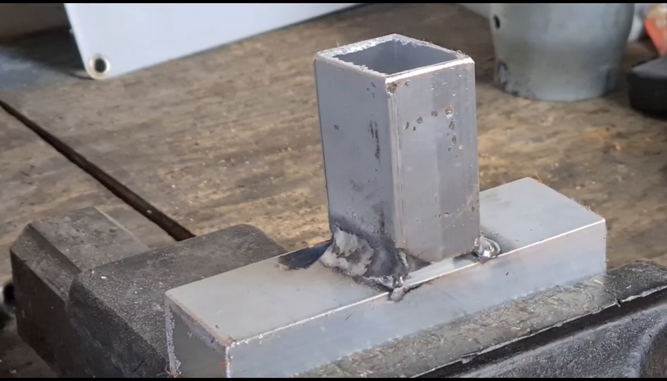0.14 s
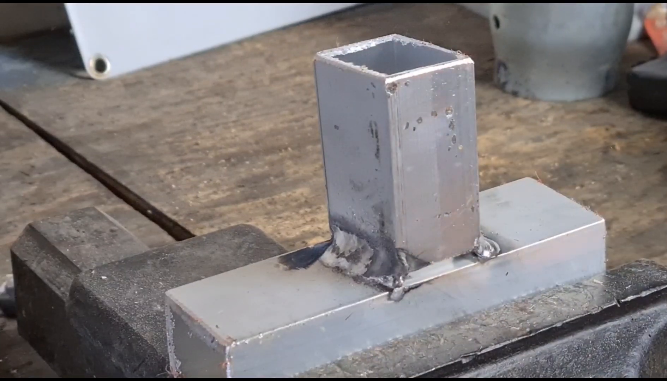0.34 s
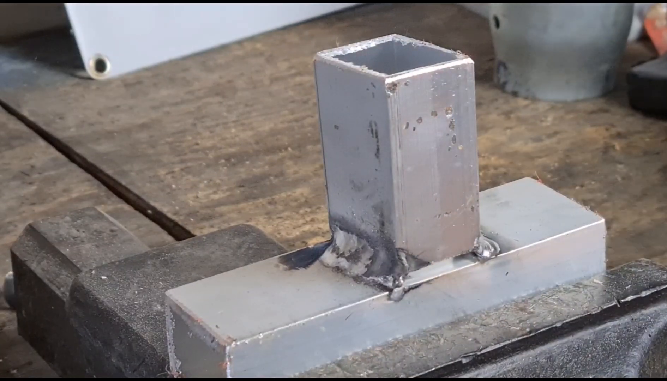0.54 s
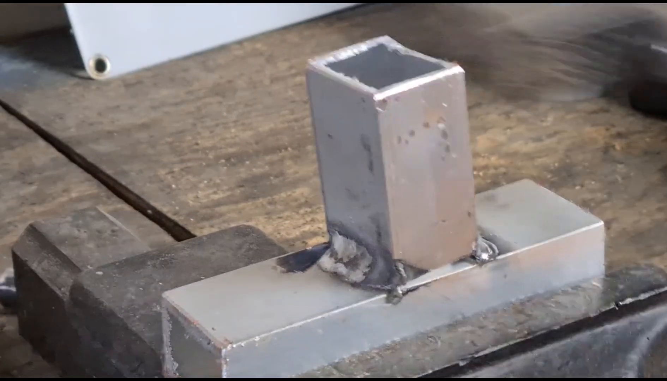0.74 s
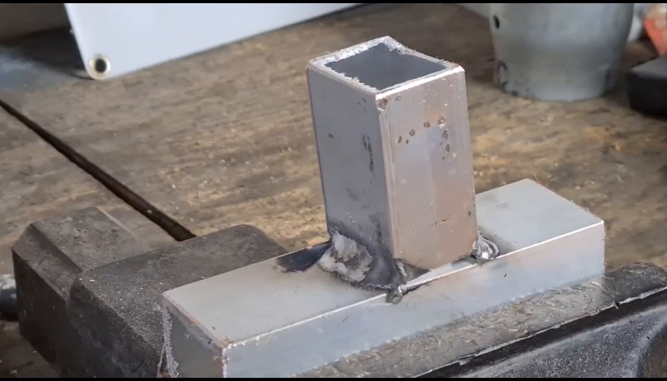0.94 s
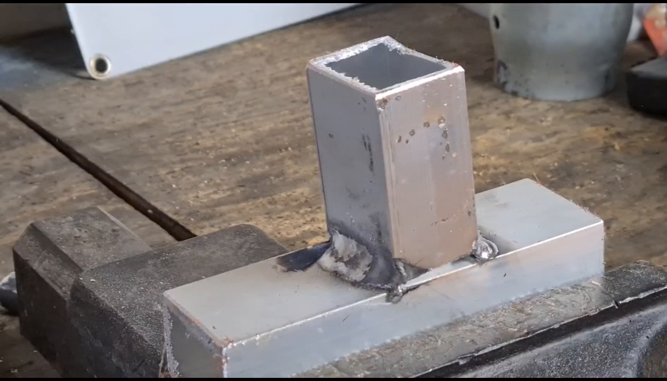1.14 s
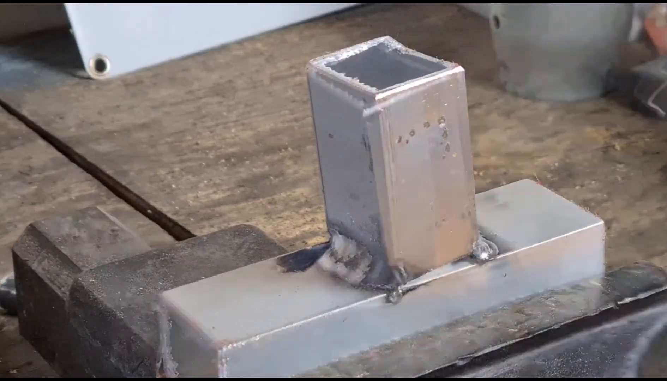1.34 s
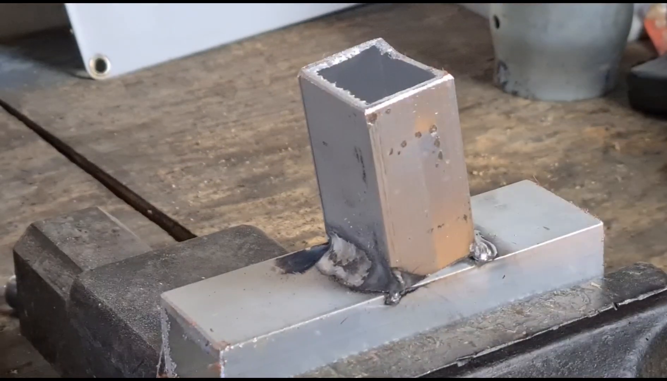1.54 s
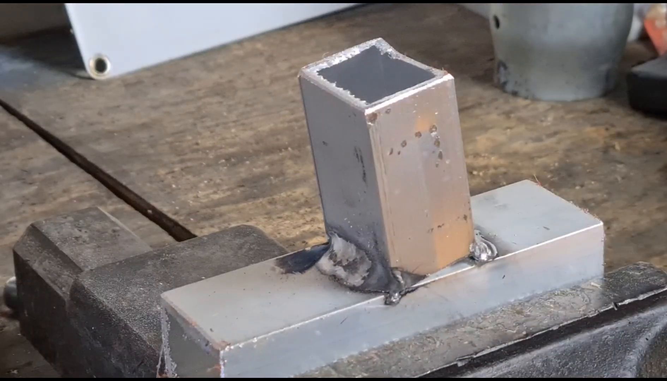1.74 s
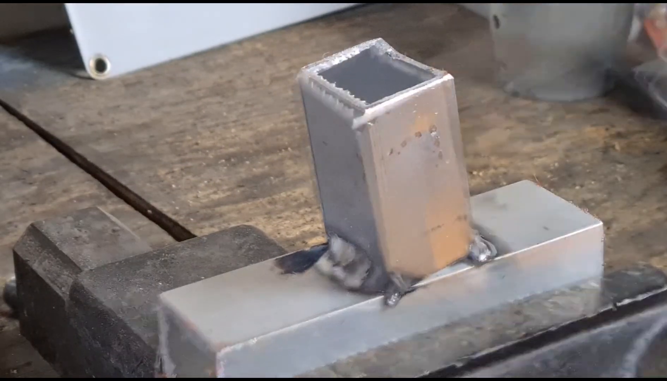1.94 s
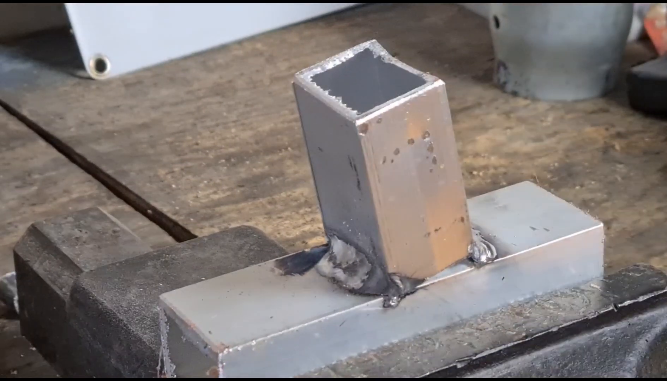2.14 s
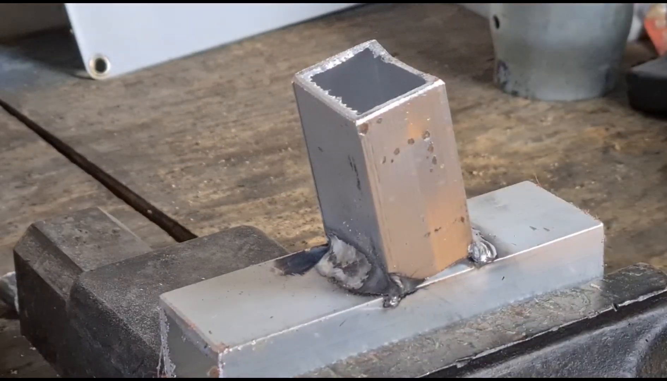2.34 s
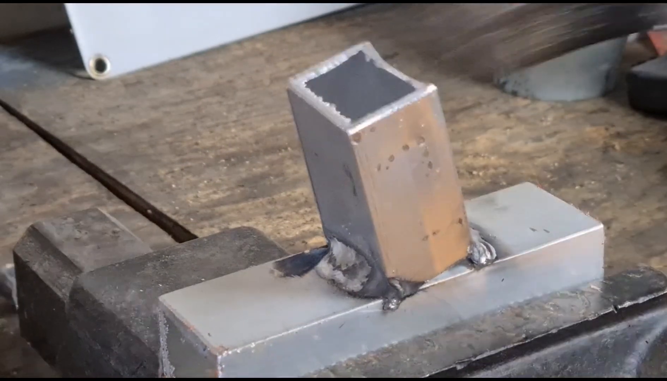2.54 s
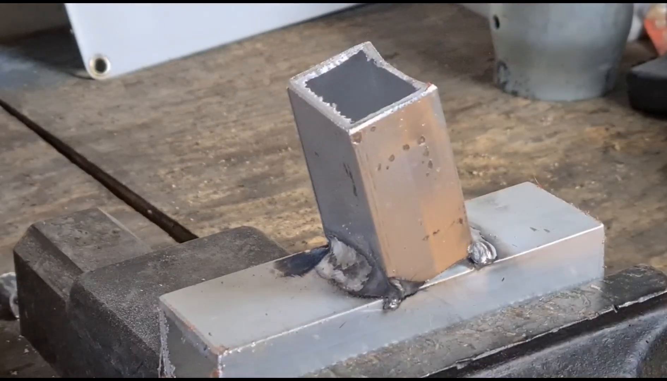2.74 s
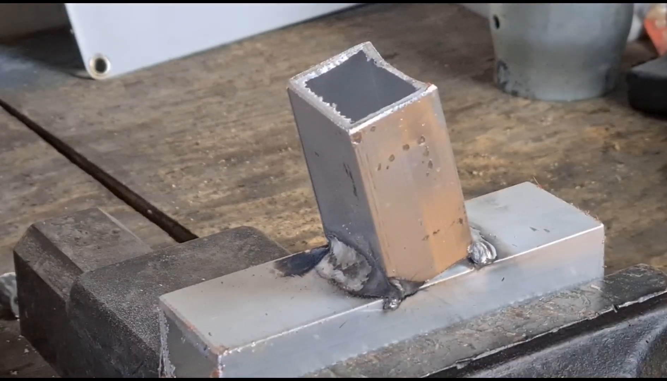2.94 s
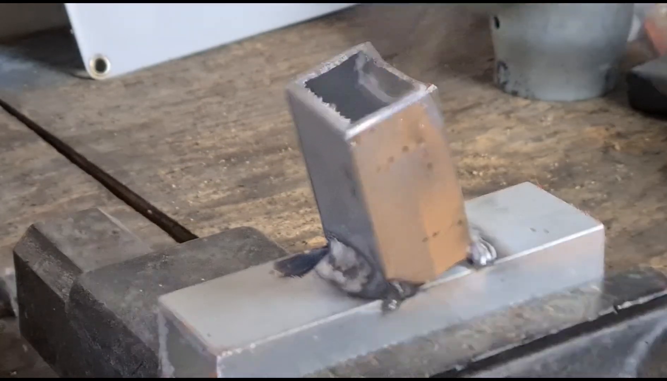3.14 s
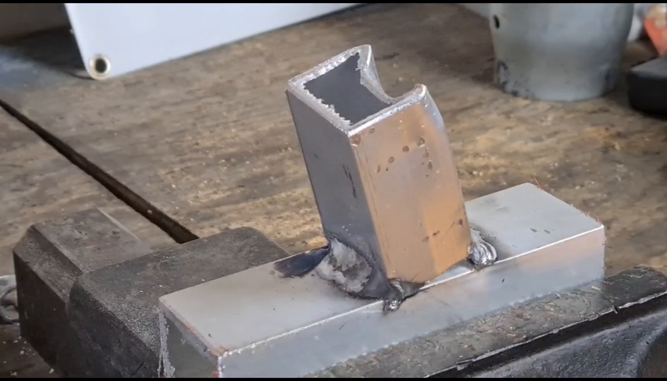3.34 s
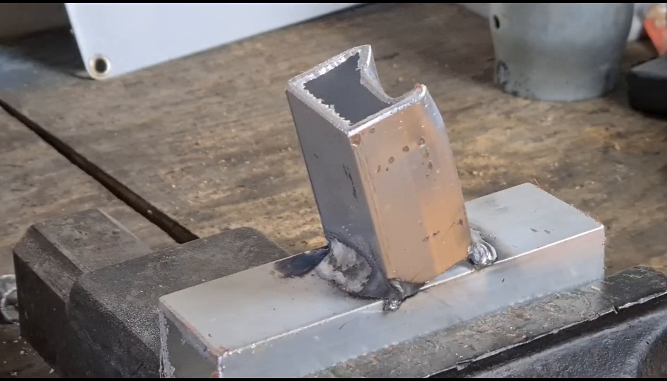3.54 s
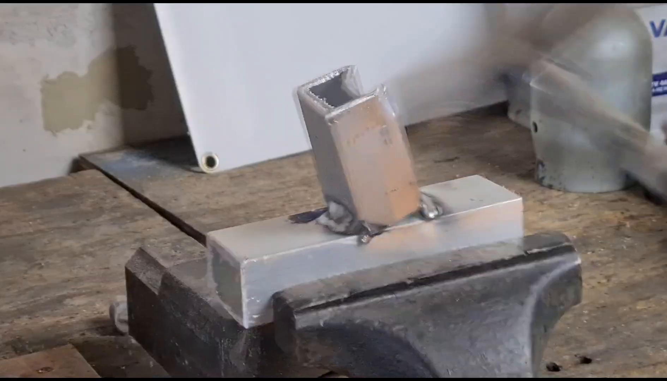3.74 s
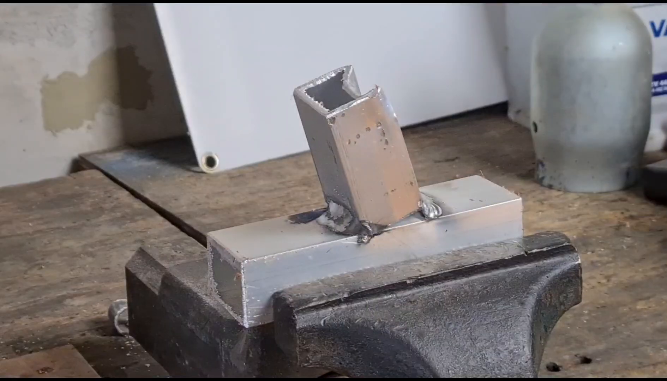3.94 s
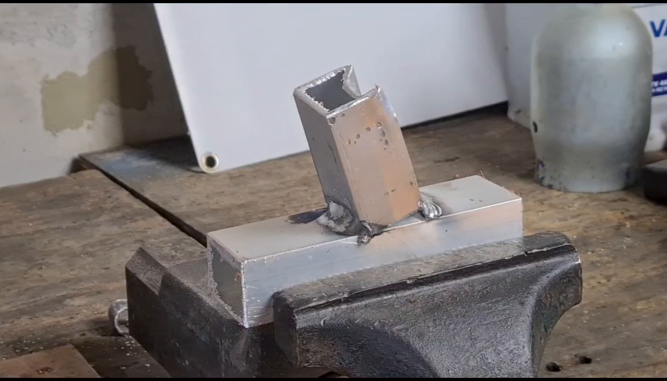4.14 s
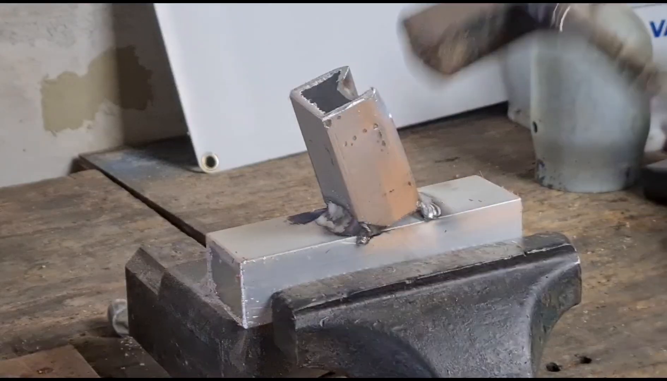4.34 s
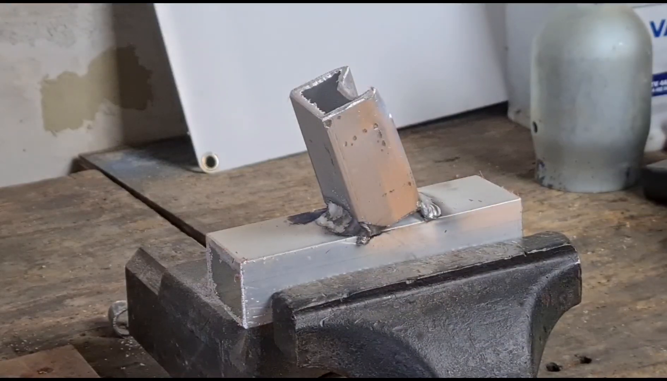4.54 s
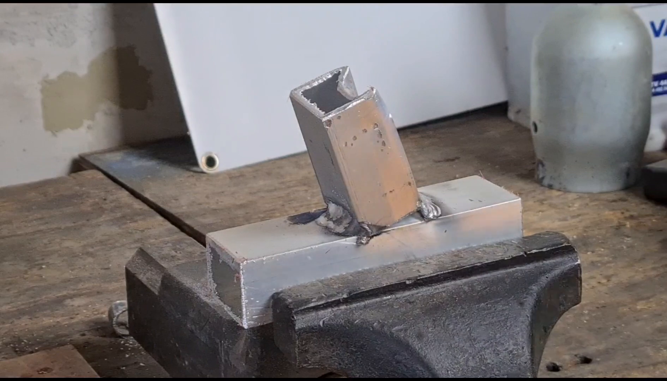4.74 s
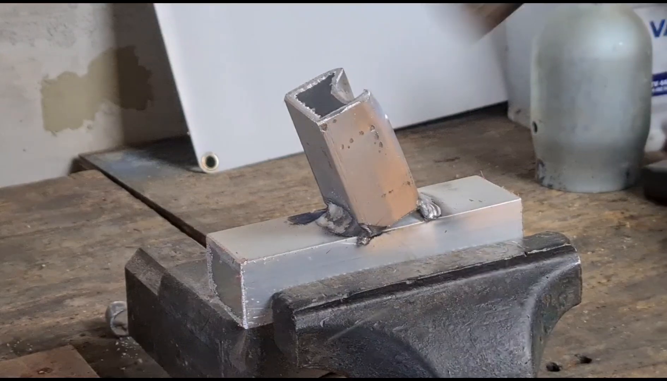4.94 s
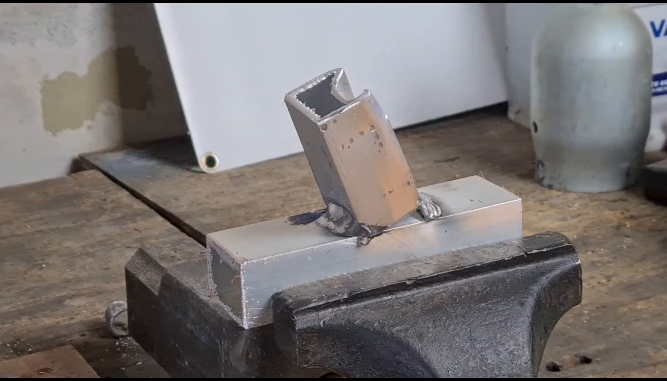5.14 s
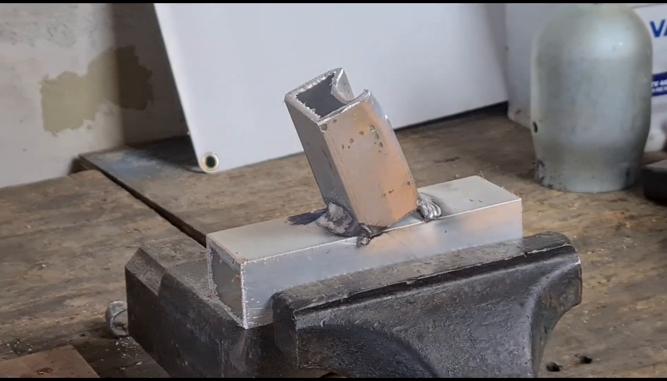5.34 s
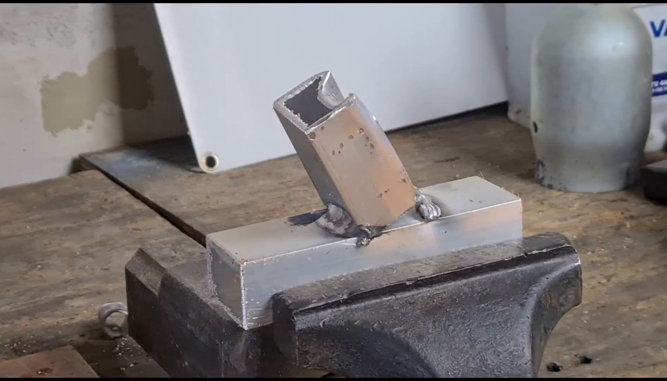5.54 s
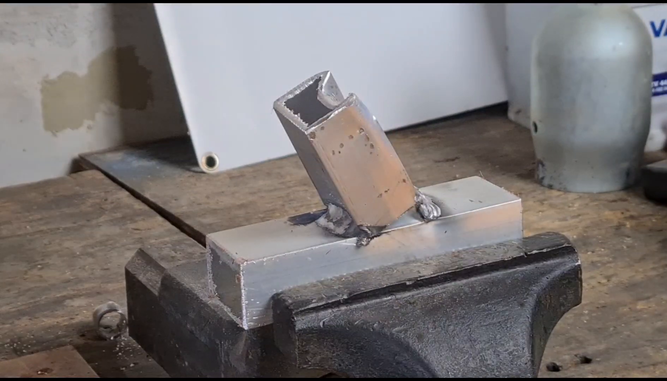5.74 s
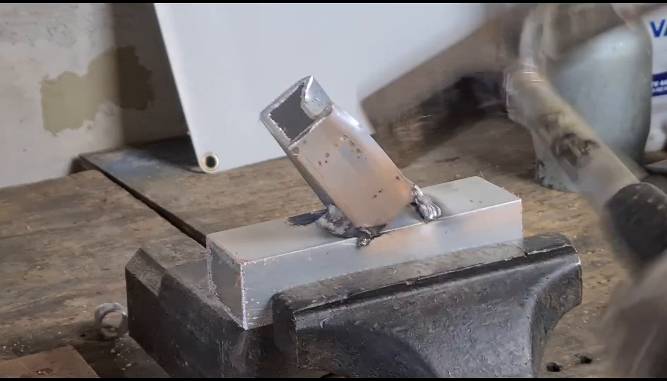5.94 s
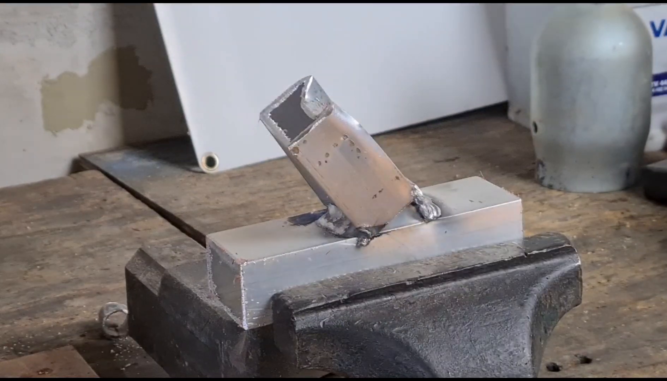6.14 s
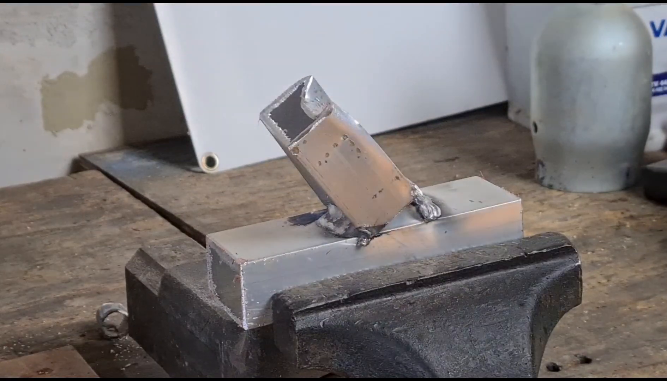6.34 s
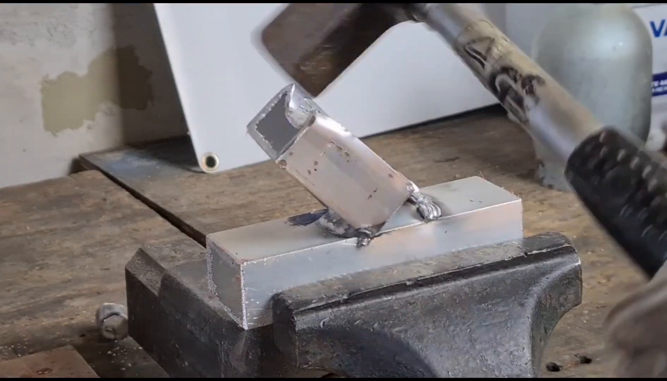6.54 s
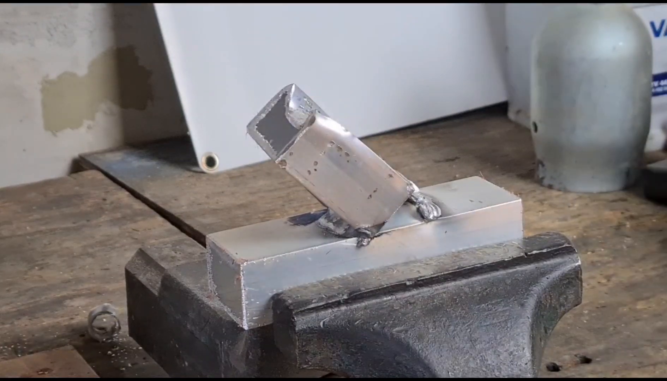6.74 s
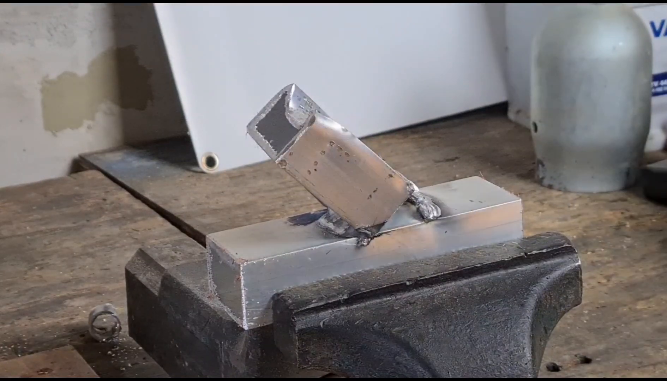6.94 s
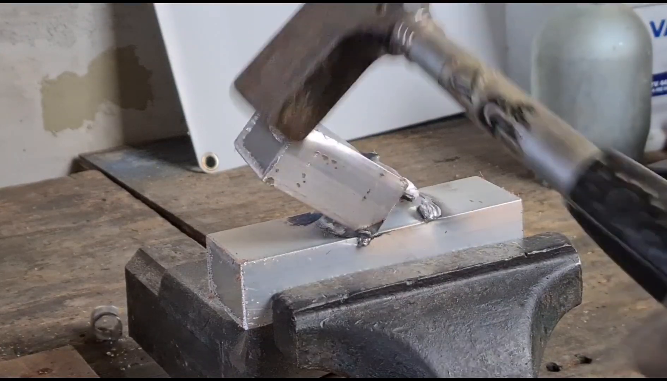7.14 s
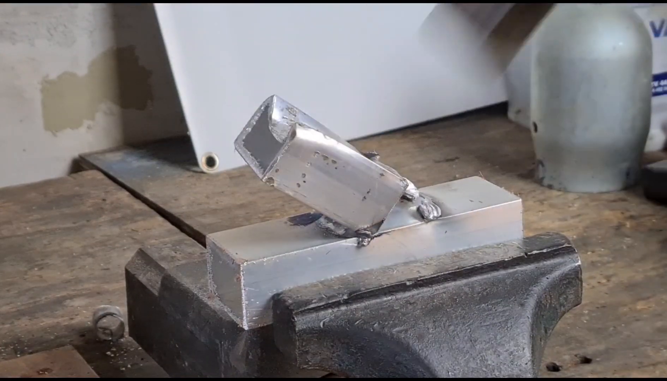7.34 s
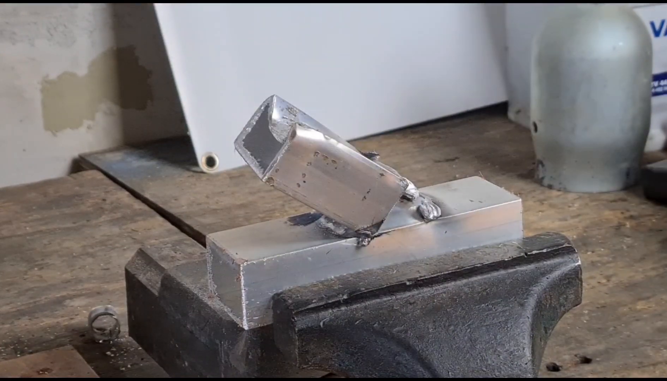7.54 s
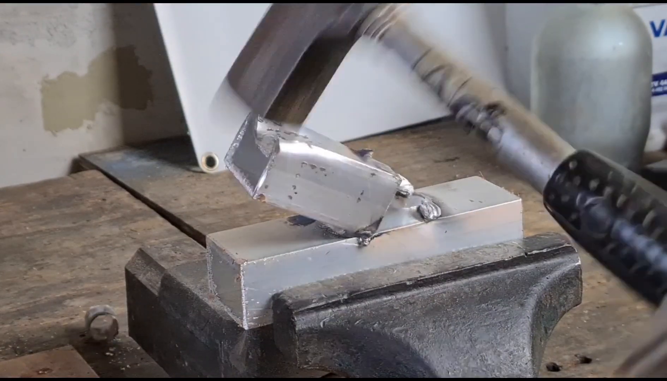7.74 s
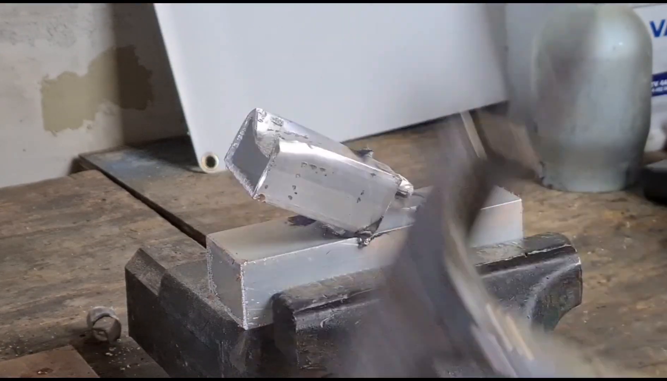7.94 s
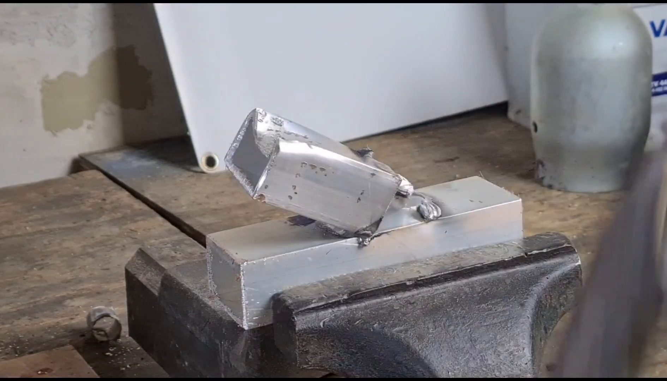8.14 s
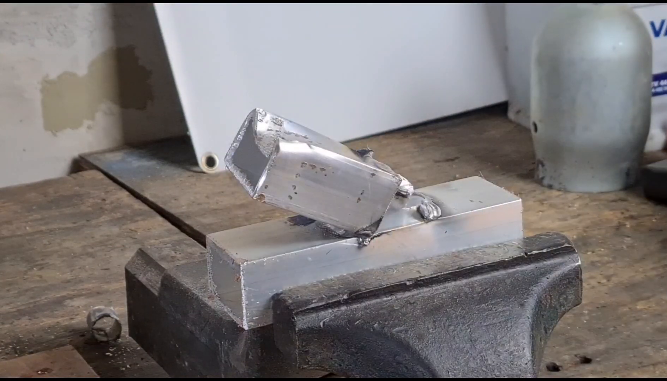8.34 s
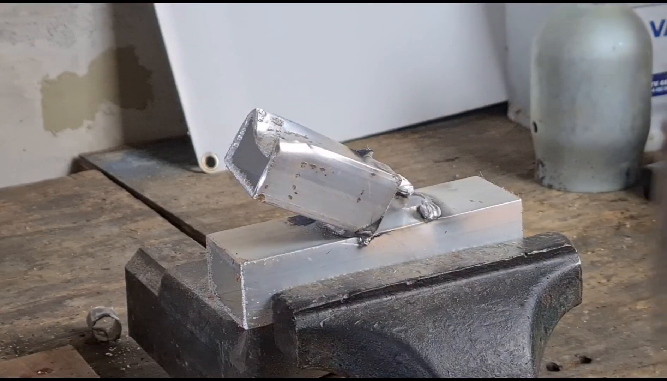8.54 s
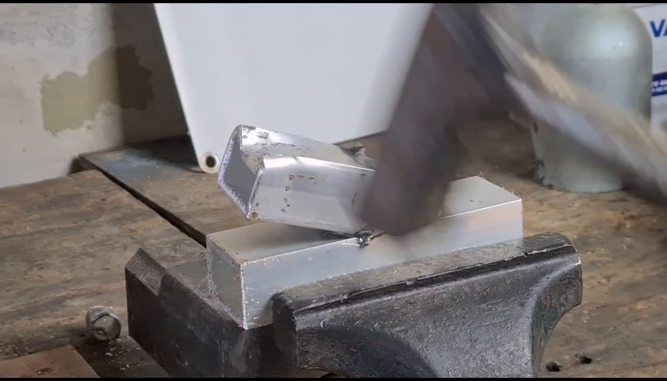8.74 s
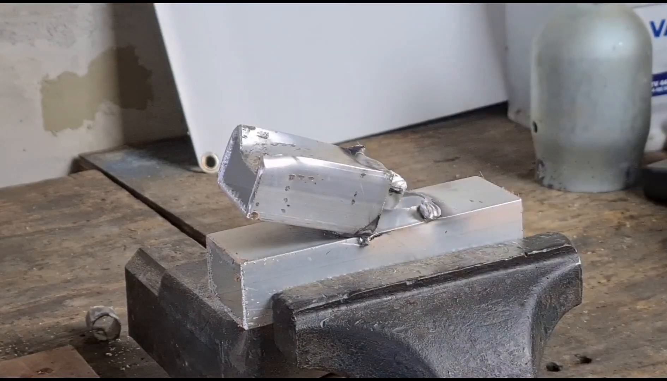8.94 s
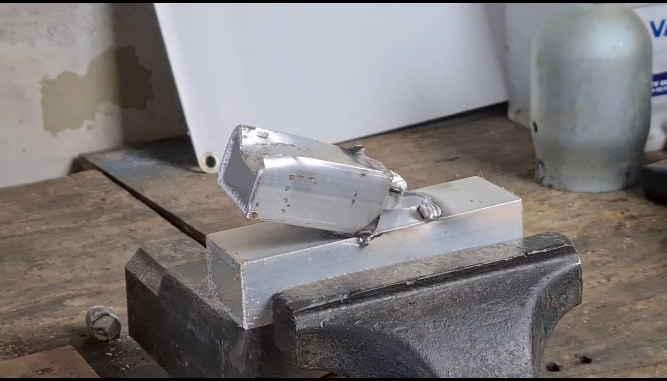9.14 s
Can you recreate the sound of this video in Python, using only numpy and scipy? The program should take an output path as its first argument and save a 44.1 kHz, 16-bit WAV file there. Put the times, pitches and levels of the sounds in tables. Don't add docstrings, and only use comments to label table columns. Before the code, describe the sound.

Loud, steady hammer blows on a welded metal tube, each a clanging crack and bench thud, turning duller and looser as the weld tears.

```python
import sys
import numpy as np
from scipy import signal
from scipy.io import wavfile
from scipy.ndimage import uniform_filter1d, minimum_filter1d

SR = 44100
rng = np.random.default_rng(int(sys.argv[2]) if len(sys.argv) > 2 else 0)


def voltage_ratio(decibels):
    exponent = np.asarray(decibels, float) / 20
    return 10 ** exponent


def int16_out(signal):
    q = np.round(np.clip(np.atleast_2d(signal).T, -1, 1) * 32767)
    wavfile.write(sys.argv[1], SR, q.astype(np.int16))


N = 405719

# start in [s], strength in [dB], brightness in [dB],
# crack in [dB], tail length as a [share].
FIRST_BLOW = [(-.06, -4.5, -4, -7, 0.95)]
# start in [s], strength in [dB], brightness in [dB], crack in [dB], tail as a [share].
BLOWS = [(.882, -10.5, -6, -11.5, 1.05), (1.471, -8.5, -4, -16.5, 1.053), (2.067, -10, -2, -10, 1.097),
         (2.6781, -10, -2, -5, 1.122), (3.293, -10.5, -2.5, -2.5, 1.08), (3.917, -6.5, -6, -11, 0.92),
         (4.447, -5.5, -5, -12, 0.91), (4.9931, -8, -3, -18, 1), (5.544, -8, -4.5, -20, 0.94),
         (6.0737, -11, -2.5, -7, 0.88), (6.638, -12.5, 3.5, 4, 1.03), (7.225, -14, 5.5, 5, 1.02),
         (7.856, -9.5, -2.5, -1, 0.8), (8.705, -8.5, 1.5, 7.5, 0.76)]
# centre in [s], level in [dB], length in [s].
MOVEMENTS = [
    (0.425, -46, 0.022),
    (0.506, -48, 0.032),
    (0.65, -51, 0.067),
    (0.823, -53, 0.014),
    (3.767, -49, 0.013),
    (3.863, -34, 0.026),
    (8.297, -51.5, 0.063),
    (8.454, -59.5, 0.068),
    (8.64, -62, 0.072),
    (9.15, -56, 0.068),
]
# frequency in [Hz], level in [dB per Hz].
SWISH_SPECTRUM = [(180, -70), (300, -60), (507, 3.5), (691, -9), (763, -0.5), (1060, -8), (2400, -11),
                  (3270, -13.5), (15000, -36)]
# frequency in [Hz], level in [dB per Hz].
ROOM_SPECTRUM = [(18, -54), (70, -25.5), (128, -9.5), (171, -6.5), (268, -4), (455, -7.5), (493, -10),
                 (625, -8.5), (1270, -13.5), (5440, -20), (14100, -23.5), (15200, -40), (16500, -77)]
# frequency in [Hz], early t60 in [s], late t60 in [s], late share in [dB], build-up in [s].
ROOM_DECAY = [(40, 2.7, 1.9, -2.5, 0.024), (103, 0.57, 4.2, -5, 0.029), (320, 0.91, 2.1, -26, 0.0021),
              (1060, 0.71, 0.69, -30, 0.0025), (3260, 0.55, 2.3, -43, 0.00071),
              (8600, 0.4, 9.5, -65, 0.0003), (16000, 0.45, 1.0, -50, .001)]
# frequency in [Hz], level in [dB], t60 in [s].
BENCH_MODES = [(54.8, -21.5, 1), (102, -7, 0.32), (161.73, -2, 0.31), (185.4, -6, 0.76),
               (241.5, -2.5, 0.23), (286.7, -3, 0.34), (327.7, -7.5, 0.5), (365.4, -11, 0.21),
               (396.5, -7, 0.2), (453, -9, 0.29), (535, -10, 0.33), (614.5, -4, 0.065)]
# frequency in [Hz], level in [dB], t60 in [s].
WALL_MODES = [(2000, -20, .06), (3050, -17, 0.066), (3770, -17.5, 0.032), (4560, -17.5, 0.059),
              (4750, -11.5, 0.031), (5340, 2.5, 0.045), (5750, 4.5, 0.027), (6390, -4, 0.026),
              (6834, 0, 0.055), (7600, 1, 0.033), (9250, -10.5, 0.075)]
# start in [s], frequency in [Hz], level in [dB], t60 in [s].
FAVOURED_MODES = [(0.001, 6850, -22, .24), (0.001, 5410, -24, 0.22), (.38, 9750, -66, .9),
                  (0.16, 2404, -40, .3), (0.019, 102, -8, 0.64), (0.883, 4605, -11, 0.32),
                  (.882, 5240, -18, .12), (1.472, 5440, -12.5, 0.18), (1.472, 4590, -22, .6),
                  (1.731, 5400, -45, .15), (1.74, 5750, -42, 0.19), (1.74, 6100, -47, .15),
                  (2.07, 5720, -9.5, 0.35), (2.069, 1770, -15, 0.45), (2.68, 4597, -12.5, 0.43),
                  (3.293, 5920, -27, 0.31), (3.917, 4994, -12.5, 0.38), (4.449, 4920, -32.5, .24),
                  (5.546, 5900, -28.5, .1), (6.075, 4960, -20, .12), (6.074, 5420, -10, 0.11),
                  (6.076, 5660, -13.5, 0.14), (6.074, 7500, -25, 0.17), (6.639, 5370, -23, .24),
                  (7.226, 4920, -17, 0.27), (8.705, 5420, -17.5, 0.063)]
# delay in [s], level in [dB].
NEAR_ECHOES = [(.0045, -2), (0.0144, -7), (0.018, -15.5), (.033, -9.5)]
# frequency in [Hz], level in [dB per Hz].
AIR_SPECTRUM = [(24, -31.5), (50, 12), (100, 19.5), (170, 11.5), (300, 1), (950, 13), (2000, 5),
                (3300, -30), (4500, -43), (6000, -33.5), (7600, -3.5), (9500, -27.5), (15000, -31.5)]
# frequency in [Hz], level at the last blow in [dB],
# loss per earlier blow in [dB].
LOOSE_MODES = [(733, -29, 10), (1035, -18, 13), (1128, -10, 12), (1430, -9, 19), (1500, -13, 24),
               (1717, -7, 5.5), (1650, -19.5, -0.5)]
# frequency in [Hz], level in [dB], t60 in [s].
VISE_MODES = [(162.8, -1.5, 0.28), (204, -9, 0.086), (272, 0.5, .11), (335, -2, .1), (430, -7, .08)]
# frequency in [Hz], level in [dB], lag in [s], length in [s].
ROCKING_MODES = [(101.6, -9, 0.083, 0.026), (171.8, -13.5, 0.043, 0.062)]

SCENE_CHANGE_S, TORN_S = 3.730, 6.3
RUN_IN, TAIL = SR // 4, 2 * SR


def at_hz(points, hz):
    f, *columns = np.transpose(points)
    return [np.interp(np.log(hz), np.log(f), column) for column in columns]


def dying(t, t60):
    return np.exp(-np.log(1000) * t / t60)


def hump(s, length):
    return np.exp(-0.5 * ((np.arange(N) / SR - s) / length) ** 2)


def ring(x, hz, t60):
    r, w = voltage_ratio(-60 / (t60 * SR)), 2 * np.pi * hz / SR
    return signal.lfilter([0, np.sin(w)], [1, -2 * r * np.cos(w), r * r], x)


def noise_bands():
    edges = 32 * 2 ** (np.arange(28) / 3)
    white = rng.standard_normal((2, N))
    for k, (low, high) in enumerate(zip(edges, edges[1:])):
        band = signal.butter(2, [low, high], "band", fs=SR, output="sos")
        yield np.sqrt(low * high), signal.sosfilt(band, white[k % 2])


def silent_shots():
    return np.zeros((2, N + RUN_IN))


def add(shots, sound, s):
    at = round(s * SR) + RUN_IN
    part = shots[int(s > SCENE_CHANGE_S), at:at + len(sound)]
    part += sound[:len(part)]


def joined(shots):
    before = np.arange(N) < SCENE_CHANGE_S * SR
    return shots[0, RUN_IN:] * before + shots[1, RUN_IN:]


def thud_of(strength, share):
    return -6 - (1 - 0.48) * strength + 10.5 * (share - 1)


def air_and_sleeves():
    lead_s, swing_db, swing_s = 0.063, -55.5, 0.066
    moves = MOVEMENTS + [(blow[0] - lead_s, swing_db, swing_s) for blow in BLOWS]
    movement = sum(voltage_ratio(db) * hump(s, length) for s, db, length in moves)
    air = np.zeros(N)
    for centre, noise in noise_bands():
        swish = voltage_ratio(at_hz(SWISH_SPECTRUM, centre)[0] + 18.5) * movement
        quiet = voltage_ratio(at_hz(AIR_SPECTRUM, centre)[0] - 55)
        air += noise[::-1] * (swish + quiet)
    return air


def room():
    blows, t = FIRST_BLOW + BLOWS, np.arange(TAIL) / SR
    shots = silent_shots()
    for centre, noise in noise_bands():
        early, late, late_db, rise = at_hz(ROOM_DECAY, centre)
        low, high = 1 / (1 + (centre / 450) ** 2), centre / 8000
        alike = 0.91 / (1 + (centre / 407) ** 4)
        same = noise[SR // 2:SR // 2 + TAIL]
        build_up = (1 - np.exp(-t / max(rise, 1e-4))) ** 2
        filling = voltage_ratio(at_hz(ROOM_SPECTRUM, centre)[0] + 28.5) * build_up
        slow = voltage_ratio(late_db) * dying(t, late)
        hollow_db = -3.5 * np.exp(-np.log2(centre / 527) ** 2 / 0.65)
        torn_db = hollow_db - 5 * (centre / 12000) ** 2
        for k, (s, strength, bright, crack, share) in enumerate(blows):
            torn = s > TORN_S
            other = TAIL + k * (N - 2 * TAIL) // len(blows)
            answer = np.sqrt(alike) * same + np.sqrt(1 - alike) * noise[other:other + TAIL]
            level_db = strength + low * thud_of(strength, share) + high * bright + torn * torn_db
            fast = dying(t, early * share * 0.71 ** (high * torn))
            add(shots, voltage_ratio(level_db) * filling * (fast + slow) * answer, s)
    return joined(shots)


def grit():
    lumps = uniform_filter1d(rng.standard_normal(N), size=600)
    high = signal.butter(2, 5000, "high", fs=SR, output="sos")
    hiss = signal.sosfilt(high, rng.standard_normal(N))
    hops = np.zeros(N)
    for s, strength, bright, crack, share in BLOWS:
        level_db = -43.5 + 0.5 * strength + bright + (s > TORN_S) * -20
        hops += voltage_ratio(level_db) * hump(s + 0.28, 0.07)
    sizzle = hops * voltage_ratio(4 * lumps / np.std(lumps)) * hiss
    scuff = ring(rng.standard_normal(N), 3350, 0.005)
    sliding = voltage_ratio(-44) * hump(3.8, 0.057) * (np.arange(N) > SCENE_CHANGE_S * SR)
    return sizzle + sliding * scuff / np.std(scuff)


def bench():
    shots, t = silent_shots(), np.arange(TAIL) / SR
    fast, slow = dying(t, 0.36), voltage_ratio(-15.5) * dying(t, 1.66)
    modes = []
    for hz, db, t60 in BENCH_MODES:
        shaking = (fast + slow / (1 + (hz / 380) ** 4)) * rng.standard_normal(TAIL)
        mode = ring(shaking, hz, t60)
        modes.append(voltage_ratio(db - 13.5) * mode / np.std(mode))
    start_up_s = 0.007917
    for s, strength, bright, crack, share in FIRST_BLOW + BLOWS:
        level_db = strength + thud_of(strength, share) + rng.normal(0, 1.3, len(BENCH_MODES))
        add(shots, voltage_ratio(level_db) @ modes, s + start_up_s)
    return joined(shots)


def rocking():
    t, swell = np.arange(N) / SR, np.zeros(N)
    for s in [blow[0] for blow in BLOWS if blow[0] > TORN_S]:
        for hz, db, lag, length in ROCKING_MODES:
            swell += voltage_ratio(db) * hump(s + lag, length) * (t > s) * np.sin(2 * np.pi * hz * (t - s))
    return swell


def vise_knock():
    shots, t = silent_shots(), np.arange(SR // 4) / SR
    swell = (1 - np.exp(-t / 0.028)) ** 2
    for s, strength, bright, crack, share in BLOWS:
        chance = rng.normal(0, 1, (len(VISE_MODES), 3))
        modes = np.zeros(len(t))
        for (hz, db, t60), (d, bend, turn) in zip(VISE_MODES, chance):
            sine = np.sin(2 * np.pi * hz * (1 + 0.042 * bend) * t + turn)
            modes += voltage_ratio(db + 1.5 * d) * dying(t, t60) * sine
        add(shots, voltage_ratio(7 + strength + thud_of(strength, share)) * swell * modes, s)
    return joined(shots)


def favoured_modes():
    shots, length = silent_shots(), SR // 2
    t = np.arange(length) / SR
    steady = 0.39
    torn_blows = [blow[0] for blow in BLOWS if blow[0] > TORN_S]
    loose = [(s, hz, db - k * loss_db, 0.24)
             for k, s in enumerate(torn_blows[::-1]) for hz, db, loss_db in LOOSE_MODES]
    for s, hz, db, t60 in FAVOURED_MODES + loose:
        rattled = ring(rng.standard_normal(length) * dying(t, t60), hz, t60 / 4.2)
        free = dying(t, t60) * (1 - np.exp(-t * hz / 6.5)) * np.sin(2 * np.pi * hz * t)
        mode = (1 - steady) * rattled / np.std(rattled) + steady * free / np.std(free)
        add(shots, voltage_ratio(db - 8.5) * mode, s)
    return joined(shots)


def wall_ring(chatter, torn):
    spread = rng.normal(0, 1, (3 * len(WALL_MODES), 2))
    walls = np.zeros(len(chatter))
    for (hz, db, t60), (d, bend) in zip(3 * WALL_MODES, spread):
        walls += voltage_ratio(db + 2.5 * d - 12.5) * ring(chatter, hz * (1 + 0.027 * bend), t60 * 0.17 ** torn)
    return walls


def contact_crack(t, torn):
    top = signal.butter(2, 9000 if torn else 15000, fs=SR, output="sos")
    burst = signal.sosfilt(top, rng.standard_normal(len(t)) * dying(t, 0.035))
    body = voltage_ratio(-17.5) * ring(burst, 4900, 0.0038) + voltage_ratio(-13.0) * ring(burst, 4250, 0.0024)
    burst = body + voltage_ratio(-5.5) * np.diff(burst, prepend=0)
    return burst + sum(voltage_ratio(db) * np.roll(burst, round(lag * SR)) for lag, db in NEAR_ECHOES)


def tube():
    shots, t = silent_shots(), np.arange(SR // 3) / SR
    for s, strength, bright, crack_db, share in BLOWS:
        torn = s > TORN_S
        chatter = voltage_ratio(-15.5) * rng.standard_normal(len(t)) * dying(t, 0.34)
        walls = voltage_ratio(bright) * wall_ring(chatter, torn)
        crack = voltage_ratio(crack_db + 11.5) * contact_crack(t, torn)
        add(shots, voltage_ratio(strength) * (walls + crack), s)
    return joined(shots)


def scene():
    surroundings = air_and_sleeves() + room() + grit()
    support = bench() + rocking() + vise_knock()
    return (surroundings + support + favoured_modes() + tube())[None]


def limited(x):
    ceiling_db, release_db_s, look_ahead_s = -0.36, 435, 0.00019
    ramp = release_db_s * np.arange(N) / SR
    over = np.maximum(20 * np.log10(np.abs(x[0]) + 1e-9) - ceiling_db, 0)
    held = np.maximum.accumulate(over + ramp) - ramp
    ahead = max(round(look_ahead_s * SR), 1)
    cut = -minimum_filter1d(-np.maximum(held, 0), 2 * ahead + 1)
    return x * voltage_ratio(-uniform_filter1d(cut, ahead))


def roll_off(x):
    return signal.sosfilt(signal.butter(12, 16740, fs=SR, output="sos"), x)


def record(dry):
    x = signal.sosfilt(signal.butter(4, 46, "high", fs=SR, output="sos"), dry)
    x = 2.25 * np.tanh(0.44 * limited(x))
    x = signal.sosfilt(signal.cheby2(12, 30, 15800 * 0.995, fs=SR, output="sos"), x)
    return roll_off(np.clip(x, -1, 1))


dry = scene()
out = record(dry)
int16_out(out)
```